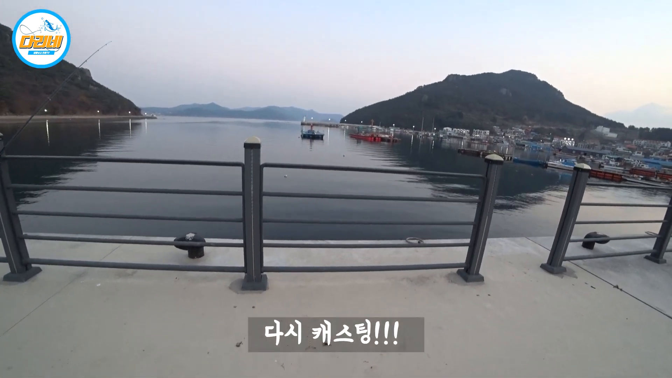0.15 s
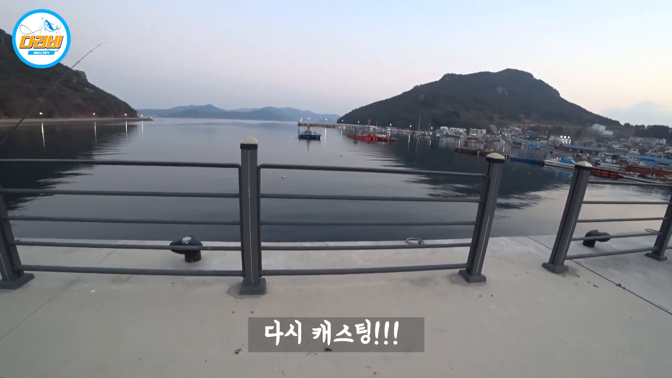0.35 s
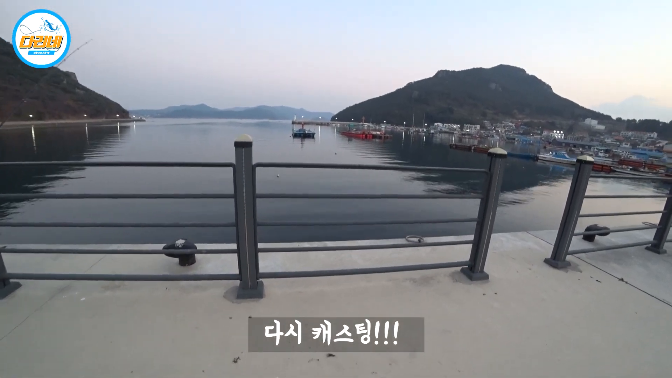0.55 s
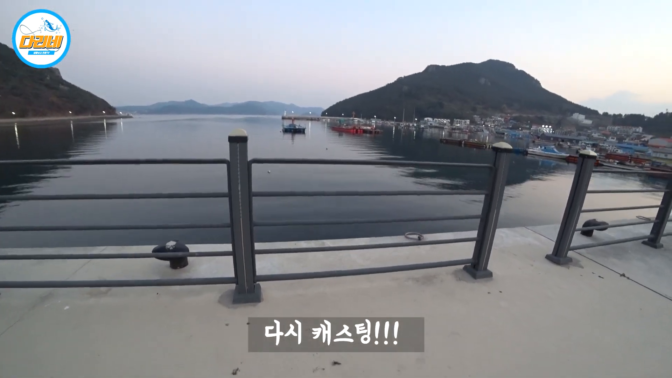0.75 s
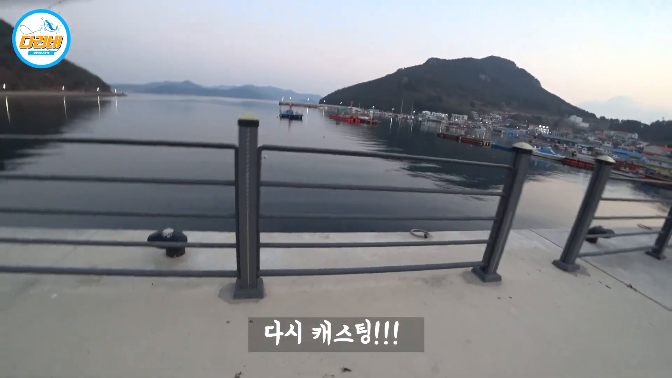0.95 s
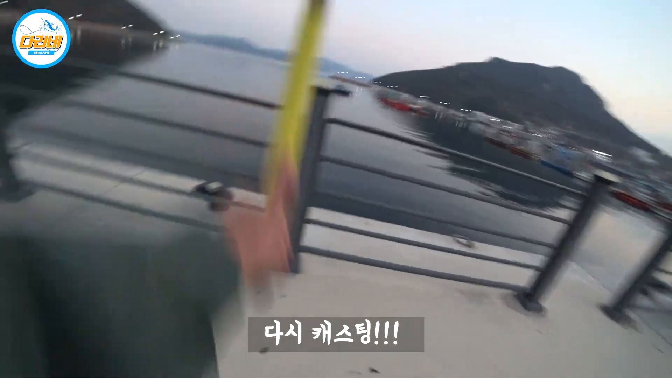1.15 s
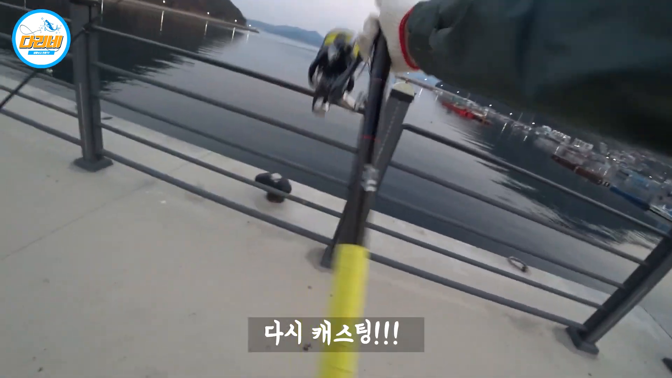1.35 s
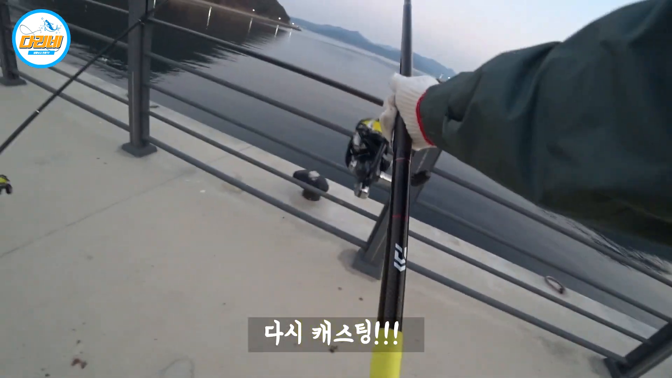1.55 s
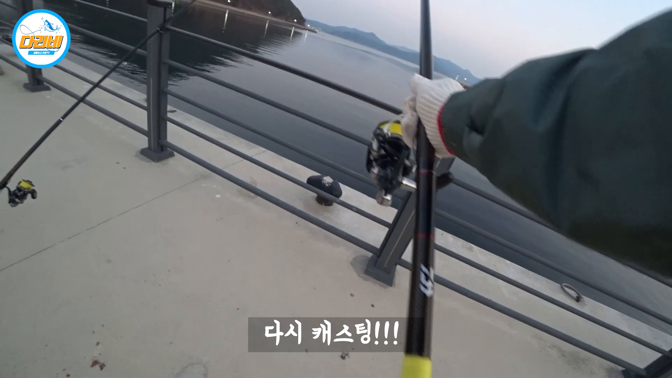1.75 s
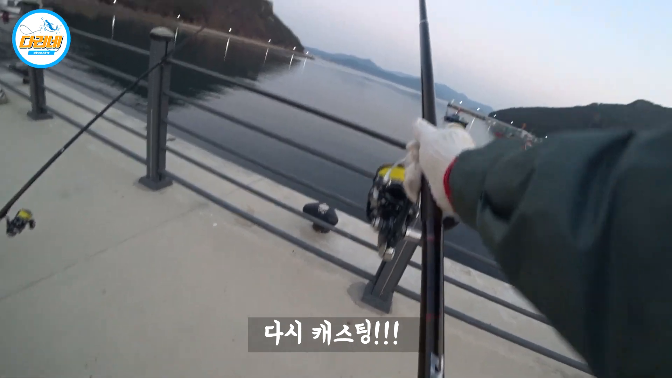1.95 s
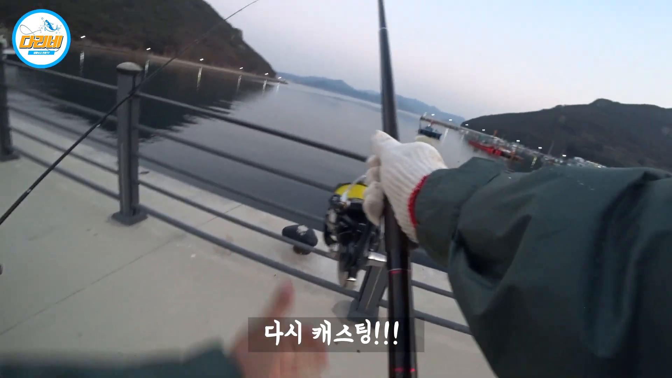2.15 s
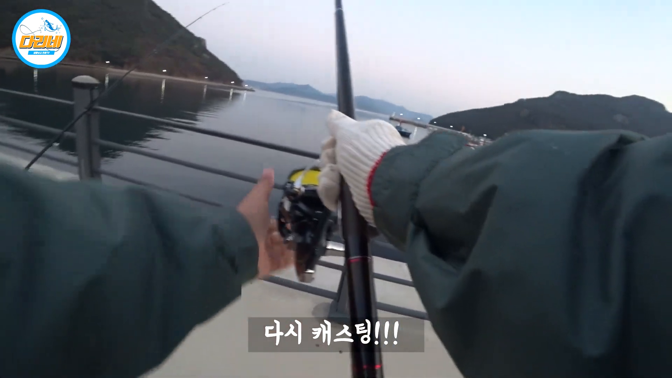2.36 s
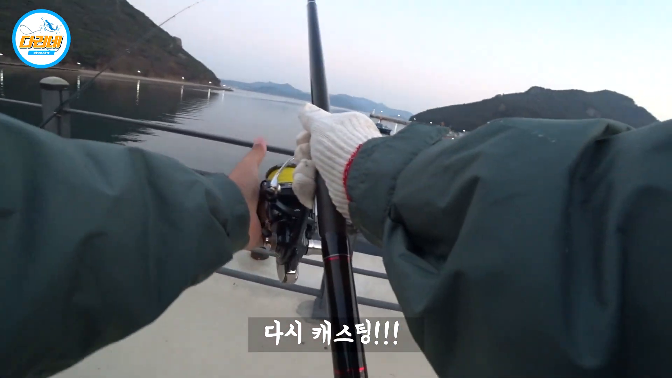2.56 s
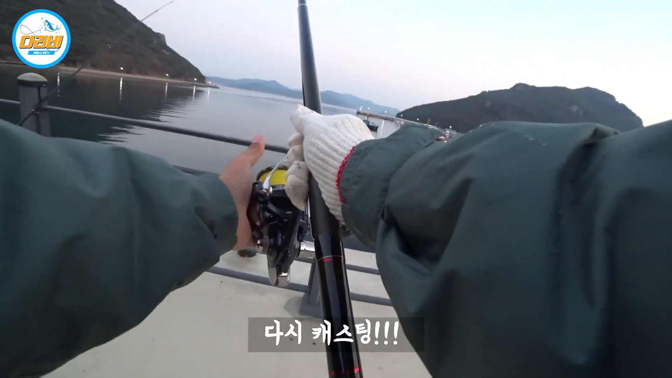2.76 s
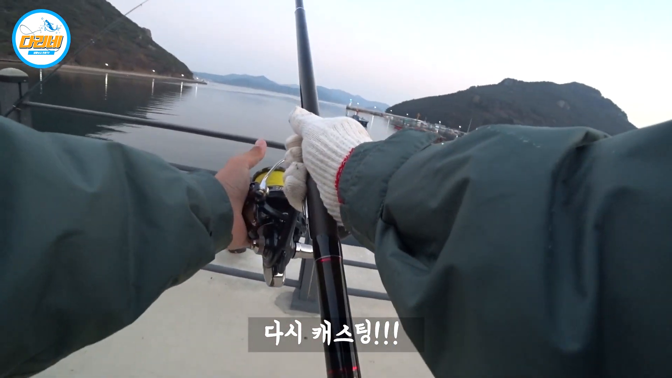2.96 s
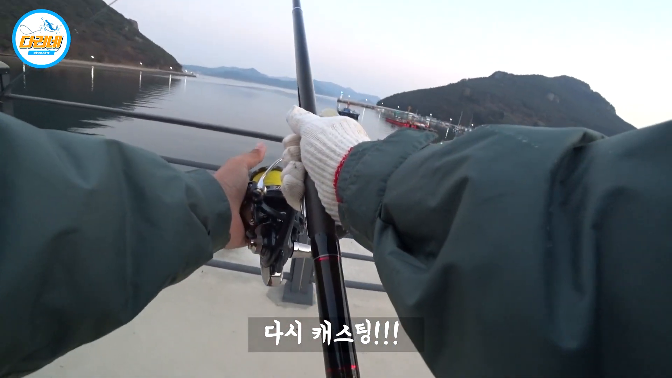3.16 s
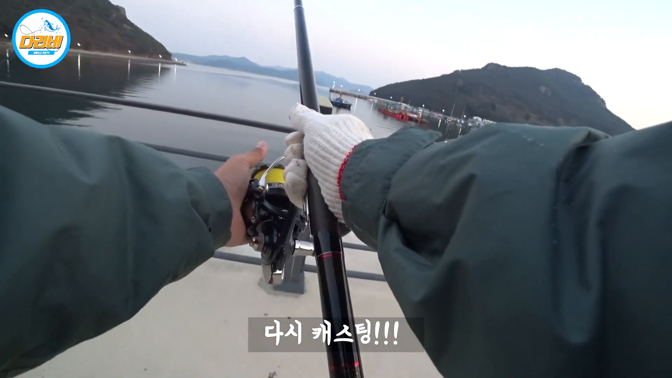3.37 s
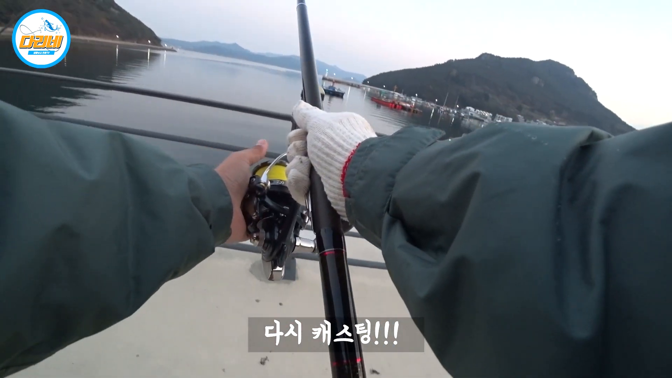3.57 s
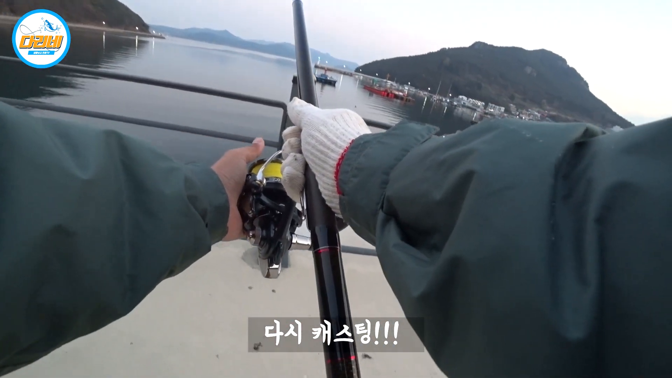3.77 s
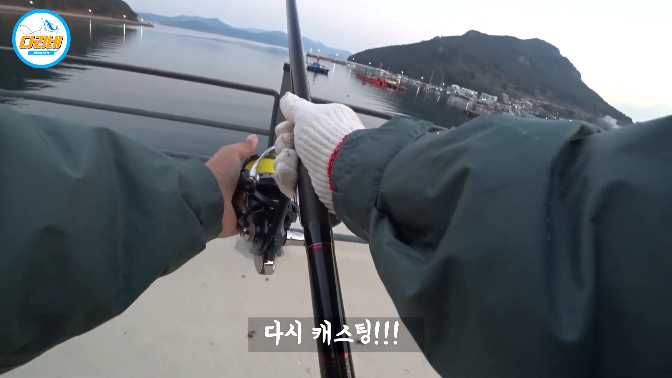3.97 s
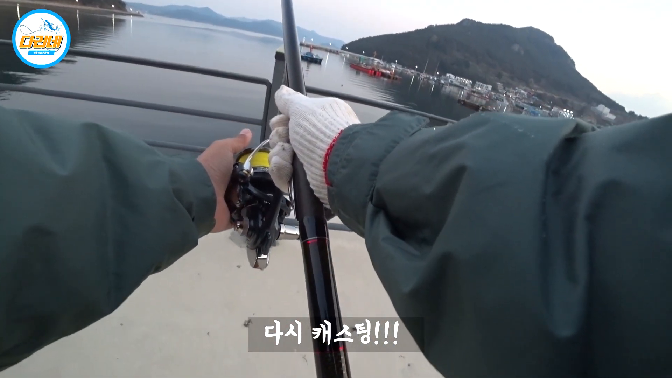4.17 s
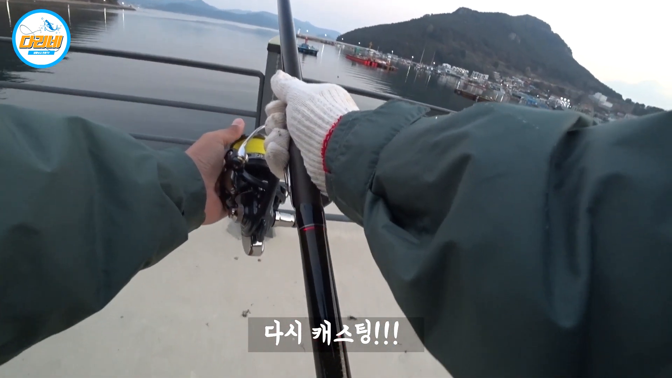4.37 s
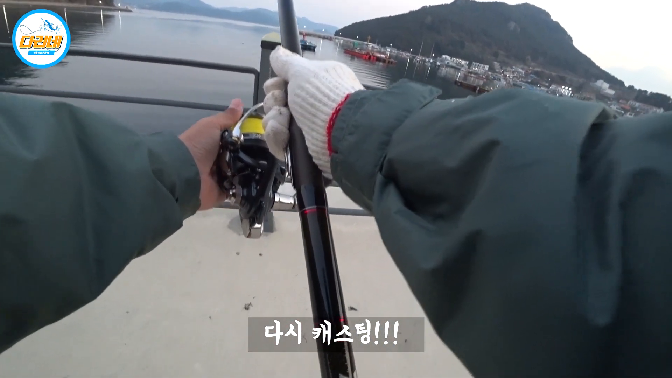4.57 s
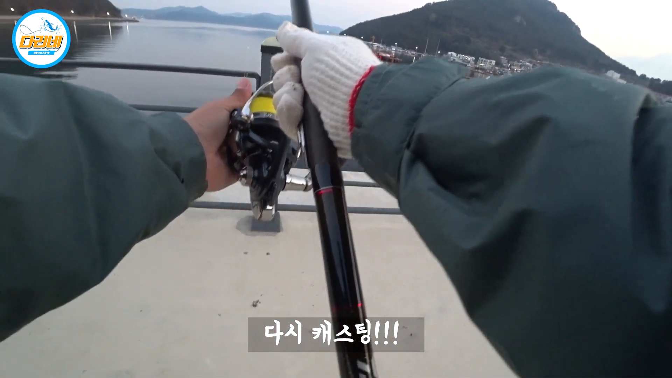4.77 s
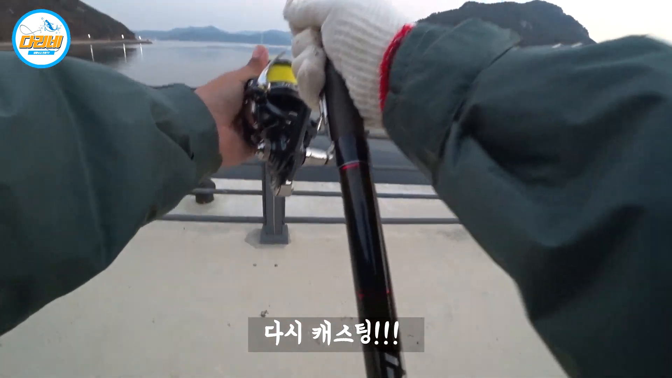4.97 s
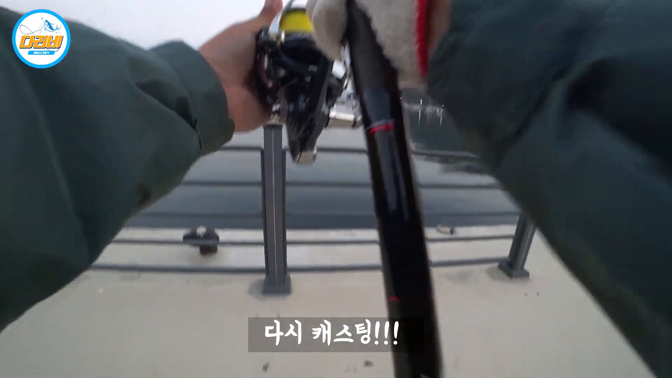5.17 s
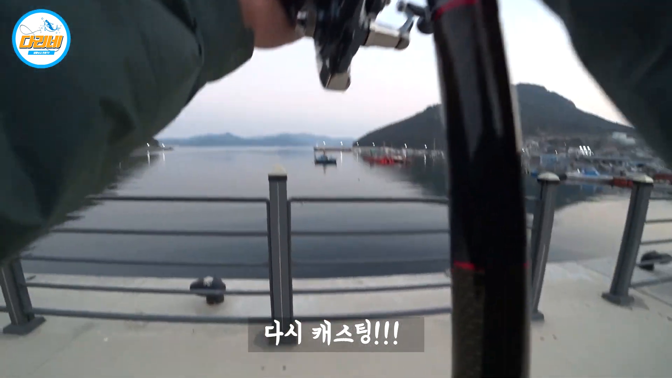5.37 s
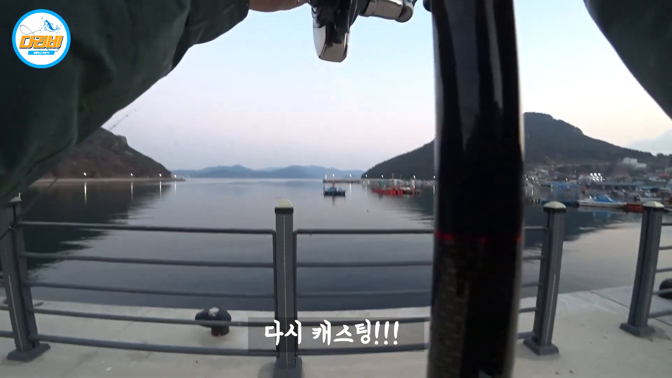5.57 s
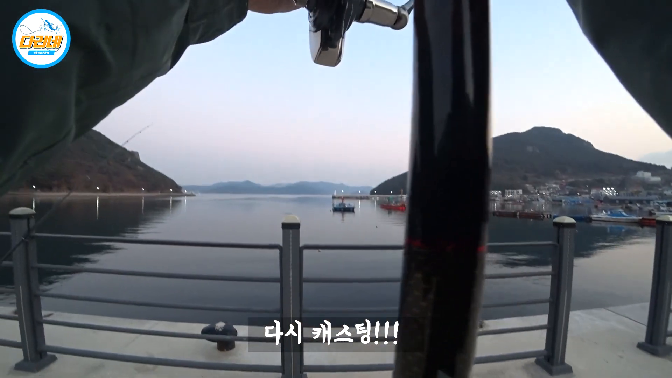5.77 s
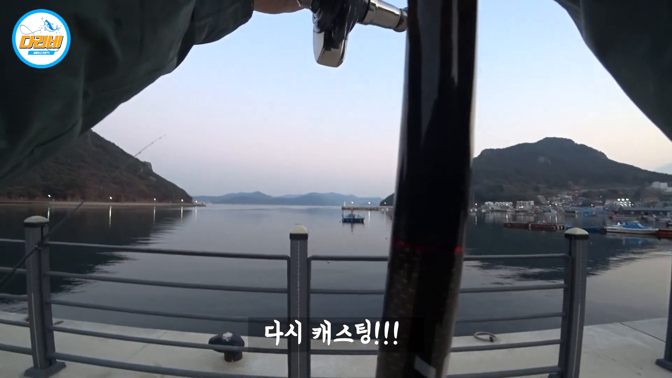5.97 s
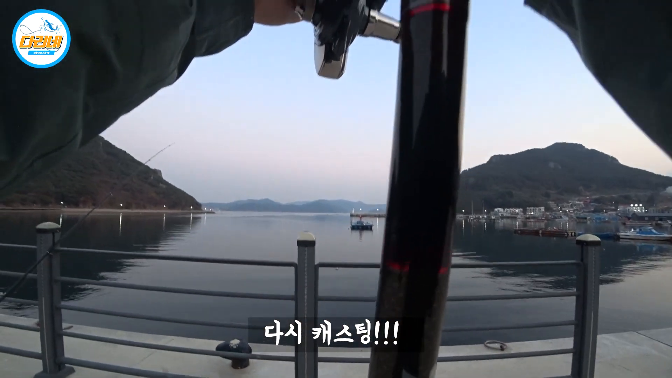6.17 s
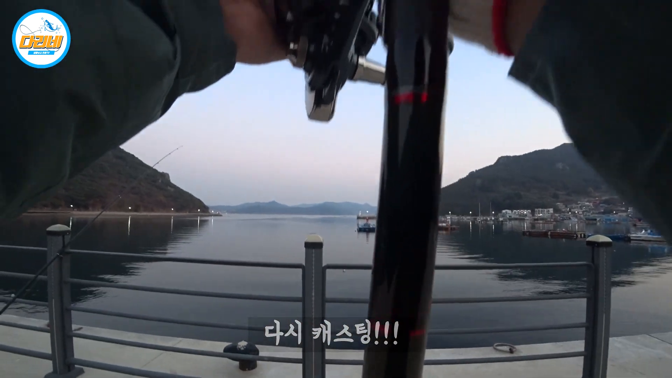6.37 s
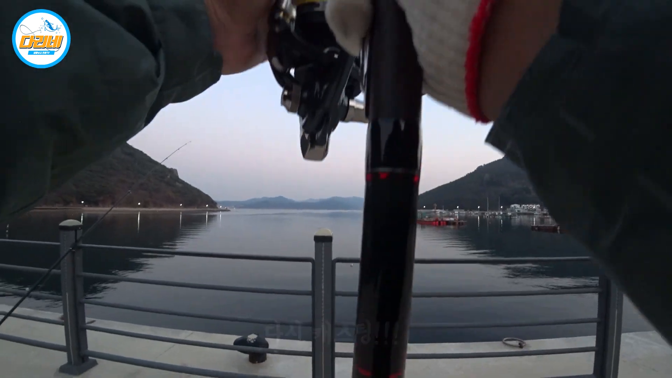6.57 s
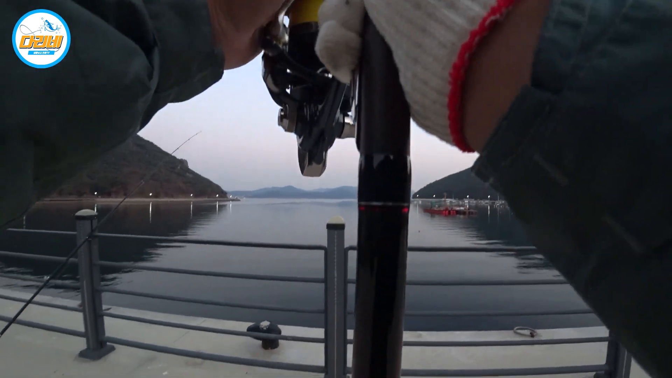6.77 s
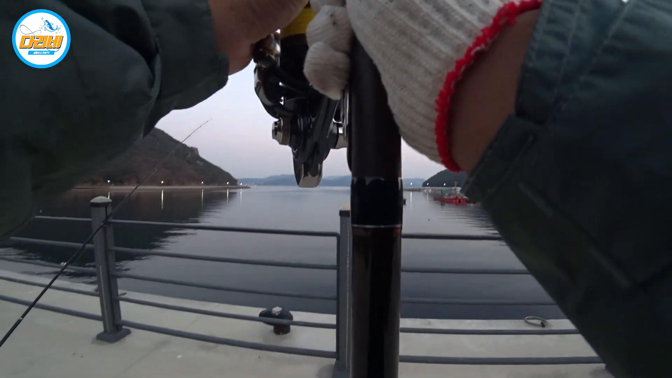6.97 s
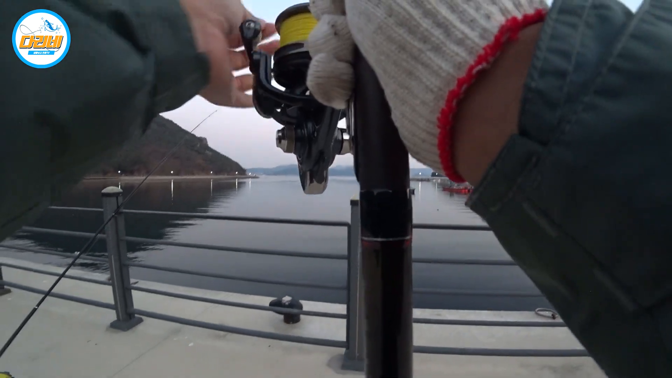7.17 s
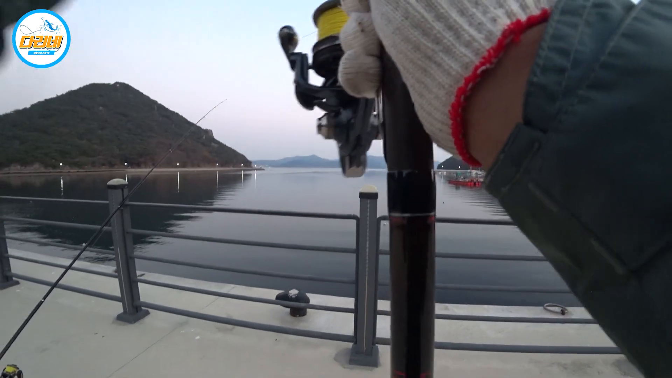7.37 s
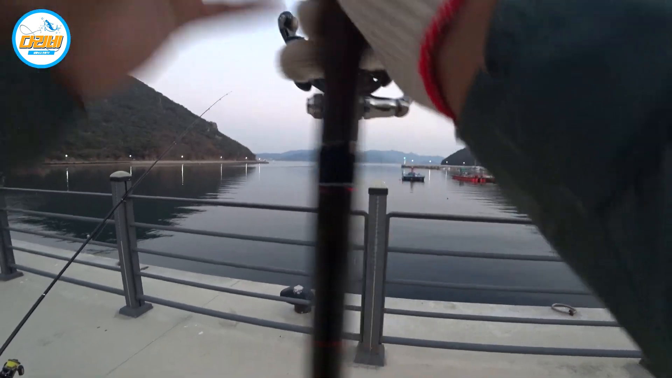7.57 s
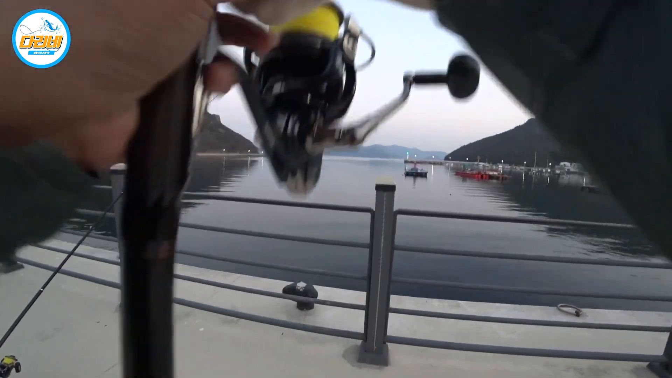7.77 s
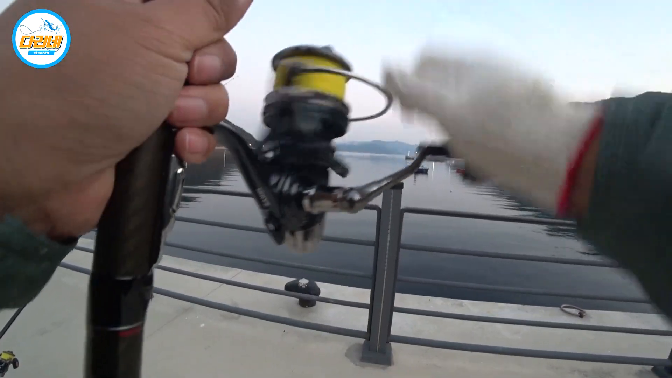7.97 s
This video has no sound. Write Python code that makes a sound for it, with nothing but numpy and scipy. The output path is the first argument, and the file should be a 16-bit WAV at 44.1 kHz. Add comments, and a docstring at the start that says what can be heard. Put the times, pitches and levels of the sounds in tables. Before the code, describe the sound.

On a quiet harbour quay, a cast swishes, line whirrs off a fishing reel for over three seconds, stops, and a wire bail snaps closed.

```python
"""A quiet harbour quay, heard from the chest of an angler who casts.
Line hisses over the spool lip, ringing spool and rod until a hand brakes it; loops slap the lip.
The bail wire later snaps shut and bounces: short clusters of ringing partials and knocks.
Bands of noise whip, swish and scuff, the jacket rustles, cloth and tackle snap, a loose fitting ticks.
Behind lie murmuring noise bands, a far engine's narrow hum and an evenly chirping cricket tone."""
import sys
import numpy as np
from scipy.fft import rfft, irfft, next_fast_len
from scipy.io import wavfile
from scipy.ndimage import map_coordinates

SR = 44100
rng = np.random.default_rng(int(sys.argv[2]) if len(sys.argv) > 2 else 0)


def bounce(signal):
    """Save signal as a 16-bit WAV file at the path given by the first command-line argument."""
    frames = np.transpose(np.atleast_2d(signal))
    limited = np.clip(frames, -1, 1)
    pcm = np.round(limited * 32767).astype(np.int16)
    wavfile.write(sys.argv[1], SR, pcm)


N = 353682  # samples

# Line paying out until the hand brakes it, before swell and flutter:
# [t/s, hiss level/dB, spool ring over hiss level/dB, rod ring level/dB]
LINE = [(1.24, -35, 14, -46), (1.45, -46.5, 11, -46), (1.62, -43.5, 6, -38), (1.82, -43, 8.5, -38),
        (2.13, -42, 13, -29), (2.17, -41.5, 16.5, -36), (2.24, -41, 13, -33), (2.4, -42.5, 11, -35),
        (2.6, -44, 18.5, -35.5), (2.83, -42.5, 20.5, -29), (3.1, -43.5, 10, -33), (3.4, -45.5, 10.5, -35),
        (3.6, -43.5, 7, -33), (3.9, -44, 9.5, -36.5), (4.3, -43.5, 13, -31.5), (4.55, -38, 14.5, -26.5),
        (4.6, -39.5, 20, -21), (4.64, -42, 13, -28), (4.72, -47.5, 16, -23), (4.77, -72, 19, -22),
        (4.82, -104, -4, -39)]
# Tone of line scraping the lip: [f/Hz, relative level/dB]
HISS_TONE = [(800, -31.5), (2500, -12.5), (3400, -5.5), (5000, -8.5), (6500, -4), (8700, -8.5), (10500, -3),
             (12000, -12.5)]
# Resonances of the rod and its guides: [f/Hz, width/Hz, relative level/dB]
ROD_MODES = [(464, 160, -10.5), (1297, 46, -2), (1547, 84, -0.5), (1920, 136, -5), (2175, 76, -4)]
# Sharp deep and high rings of the spool, and its broad ring: [f/Hz, width/Hz, relative level/dB]
SPOOL_DEEP = [(3885, 40, -1), (3190, 90, -14), (4030, 50, -7)]
SPOOL_HIGH = [(6630, 46, -1), (6500, 92, -10)]
SPOOL_BROAD = [(4020, 180, 4.5)]
# Resonances of the spool lip: [f/Hz, width/Hz, relative level/dB]
LIP_MODES = [(10870, 88, 7.5), (10470, 310, -2)]
# Loops slapping the lip: [t/s, relative level/dB]
SLAPS = [(1.6342, -23), (2.765, -25), (2.893, -24), (2.913, -22), (3.0, -25), (3.028, -15.5), (3.0405, -21),
         (3.3693, -27), (3.443, -26), (3.5054, -23), (3.5377, -25), (3.63, -27), (3.9088, -25),
         (4.0615, -26), (4.4555, -25), (4.5117, -24), (4.555, -26), (4.6284, -25), (4.646, -28),
         (4.6944, -25)]
# The coils climb up and down the spool and the hiss swells with them, slower as the sinker slows
SWELL_SLOW_HZ, SWELL_EXTRA_HZ, SLOWING_S = 7.21, 5.28, 1.38
# Another pace once the palm touches; A_CREST_S is the time of one crest
PALM_S, SWELL_PALM_HZ, A_CREST_S = 4.22, 8.39, 2.073
SWELL_DB, SWELL_VARIES_DB = 0.67, 0.85
RINGS_SWELL = 0.97  # extra share of the swell in the spool rings
# High spool ring over the deep one, fading as the spool empties; it follows the deep one only so far
HIGH_RING_DB, HIGH_FADES_DB_PER_S, HIGH_FOLLOWS_TO_DB = 10, 2.5, 11.5
WHISTLE_DB, WHISTLE_WAVERS_RAD = -22, 1.3  # steady part of the deep ring: relative level, phase drift
JOLT_DB, JOLT_T60_S = -1, 0.028  # each slap shakes the guides: drive over the slap, time to fall 60 dB

# Bail wire contacts, a blow and its bounces: [t/s, relative level/dB]
BAIL = [(7.1598, -24), (7.1607, -2), (7.1618, -2), (7.1664, -13), (7.169, -19), (7.1735, -19),
        (7.1765, -19), (7.1789, -5), (7.181, -16), (7.1855, -9), (7.1915, -18), (7.1945, -6), (7.1988, -14),
        (7.206, -27)]
# Partials of the bail wire, before random spread: [f/Hz, relative level/dB, time to fall 60 dB/s]
WIRE = [(1800, -4, .014), (2500, -10, .012), (3200, -4, .014), (3900, -4, .01), (4450, -2, .016),
        (5200, -8, .012), (5900, -5, .012), (6200, 2, .021), (7500, -8, .008)]
# Partials of reel body and spool, before random spread: [f/Hz, relative level/dB, time to fall 60 dB/s]
BODY = [(436, -10, .17), (465, -14, 0.14), (870, -19, 0.1), (942, -18, 0.11), (1010, -20, 0.08),
        (3890, -30, .13)]
KNOCK_DB, KNOCK_GROWS_DB_PER_S = -8.5, 200  # the wire settles ever more fully on the body
RING_FADES_DB_PER_S = 220  # the fingers damp the wire as it settles

# Snaps of cloth and tackle: [t/s, relative level/dB, f/Hz, left over right level/dB]
SNAPS = [(0.721, -42, 1440, 15), (.799, -37.5, 4500, -2), (0.854, -38, 4500, 0), (0.8766, -39, 940, -2),
         (.9423, -36, 1500, -1), (0.972, -35, 3500, 3), (.984, -34, 2500, 6), (1.0304, -30, 2920, 18),
         (1.0315, -32.5, 1200, 6), (1.054, -24.5, 5000, 12), (1.056, -33, 2000, 8),
         (1.0755, -16.5, 3570, 12), (1.0855, -37, 2500, 8), (1.139, -31, 2000, 6), (1.143, -28, 2200, 13),
         (1.149, -26.5, 1620, 17), (1.29, -16, 1570, -3), (1.3656, -26, 5500, -3),
         (1.5629, -13, 3660, -0.5), (1.989, -33.5, 990, -4), (2.011, -37, 804, 3), (2.038, -23, 4680, -2),
         (2.0932, -35, 1300, 2), (2.124, -32, 1060, 6), (2.2051, -22, 2100, 12), (2.213, -17, 3600, 7.5),
         (2.238, -37, 1450, 19), (2.266, -37, 1200, 3), (2.298, -39.5, 1100, 3), (2.3165, -28, 2160, 17),
         (2.421, -32.5, 2760, 13), (2.6329, -29.5, 3000, 11), (2.8889, -23.5, 4900, -3),
         (3.693, -34, 1710, 0), (5.182, -40, 990, -3), (5.2185, -38, 2100, -5), (5.352, -35.5, 1130, -5),
         (5.3677, -29.5, 1660, -1), (6.205, -43, 1500, -4), (6.9287, -39, 2100, -18), (7.324, -46, 990, 8),
         (7.454, -41, 1000, 2)]
SNAP_CYCLES, CRACK_REACH = 6.9, 1.06  # cycles to fall 60 dB; crack cutoff as a multiple of the pitch

# Arm movements; rise and fall span 10 dB: [peak t/s, rise t/s, fall t/s, dull half level/dB,
# bright half over dull half level/dB, left over right level/dB]
MOVES = [(.6, 0.44, 0.69, -54, -2, 3.5), (.98, 0.18, 0.44, -43, 3.5, 2), (1.14, 0.14, 0.26, -41, 1, 4),
         (1.22, 0.14, 0.1, -38, 2, 6.5), (1.3, 0.13, 0.11, -38.5, 11.5, 2), (1.39, 0.21, 0.18, -38, 6.5, 1),
         (2.05, 0.99, 0.15, -47, 2, -3), (2.24, 0.12, 0.25, -41.5, -12, 3.5), (4.55, 0.76, 1, -52, 1, -1.5),
         (5.32, 0.3, 0.1, -45, -5.5, -8), (5.45, 0.65, 0.16, -52.5, 9, -0.5),
         (6.35, 0.44, 0.93, -59.5, 5, -0.5), (7.53, 0.69, 0.2, -54, 5, 6),
         (7.68, 0.45, 0.098, -59, 13.5, 0), (8.0, 0.55, 0.11, -53.5, 9, -1.5)]
# Tone of the jacket cloth: [f/Hz, relative level/dB]
CLOTH_TONE = [(120, -56), (200, -23), (391, -9.5), (615, -2.5), (1290, -2), (1520, -3), (2060, -4.5),
              (5440, -6.5), (11000, -19.5), (14300, -51), (22000, -120)]
# Small pops of the cloth, one row per crease size: [f/Hz, width/Hz, relative level/dB]
CREASES = [(936, 160, 4), (1900, 450, -2), (3620, 1100, 0)]
REST_DB, REST_BRIGHT_DB = -55, -9.5  # the jacket never lies quite still; bright half over dull half
# 1 = pointed peak, 2 = round; brightness lost as a movement slows
ROUNDNESS, DULLS_DB_PER_DB = 1.25, 0.9
POPS_PER_S, POP_DB = 21, 26.5  # for each crease size; relative level

# Brief band-limited noises, the whip and swish of the cast, then rubs and scuffs:
# [start t/s, peak t/s, end t/s, level/dB, low f/Hz, high f/Hz]
SWISHES_AND_SCUFFS = [(1.282, 1.291, 1.308, -26, 1100, 11000), (1.315, 1.34, 1.4, -36, 2600, 3600),
                      (1.222, 1.235, 1.27, -34, 2300, 7000), (1.33, 1.345, 1.355, -34, 4900, 7500),
                      (1.363, 1.366, 1.374, -28, 3000, 11000), (1.47, 1.53, 1.565, -43, 1500, 7500),
                      (3.02, 3.03, 3.055, -42, 1200, 6000), (4.27, 4.31, 4.35, -41, 1900, 4000),
                      (4.3, 4.36, 4.42, -36.5, 420, 5500), (6.05, 6.09, 6.15, -53, 815, 885),
                      (6.06, 6.11, 6.16, -56, 1200, 1900), (6.22, 6.38, 6.56, -59, 255, 500),
                      (7.7, 7.77, 7.81, -56, 5450, 5750), (7.75, 7.8, 7.86, -40, 5200, 11000),
                      (7.965, 7.975, 8.05, -48, 5200, 10500)]

# A small loose fitting touching the rod: [t/s, relative level/dB]
TICKS = [(0.1266, -34), (7.968, -33.5)]
# Partials of that fitting, before random spread: [f/Hz, relative level/dB, time to fall 60 dB/s]
FITTING = [(1060, -3, .018), (1620, -3, .013), (4350, 0, .014), (5240, -8, .01), (7240, -4, .009)]

# Harbour murmur before lapping: [t/s, level/dB]
HARBOUR = [(0, -66), (.9, -65.5), (1.2, -57), (2.2, -59.5), (3.3, -60), (4.2, -63), (4.7, -56.5),
           (5.2, -63), (5.7, -60), (6.4, -54.5), (6.9, -61), (7.5, -57.5), (8.02, -57.5)]
# Tone of the murmur: [f/Hz, relative level/dB]
MURMUR_TONE = [(15, -58), (25, -44.5), (173, -7.5), (206, -9.5), (305, 0.5), (394, -3.5), (430, -1.5),
               (468, -3.5), (595, -6.5), (1500, -25), (1950, -31), (3300, -120)]
# Tone of the open air: [f/Hz, relative level/dB]
AIR_TONE = [(500, -3), (1200, 4), (3000, -29), (6500, 8), (9000, -1.5), (12000, 0)]
# Orders of the far engine: [f/Hz, width/Hz, level/dB]
HUM = [(90.7, 14, -81.5), (178.7, 7.7, -75), (305.3, 10, -71)]
# Cricket, level before flutter: [f/Hz, level/dB, first chirp t/s, period t/s]
CRICKET = (8120, -68.5, .0222, .10244)

TOP_HZ = 12400  # band limit


def amp(db):
    """dB to gain."""
    return 10 ** (np.asarray(db) / 20)


def unit(x):
    """Scales x to an rms of 1."""
    return x / np.sqrt(np.mean(x ** 2) + 1e-20)


def along(points, hz):
    """Reads (Hz, value) points on a log frequency axis."""
    f, v = np.transpose(points)
    return np.interp(np.log(hz + 1), np.log(f + 1), v)


def curves(rows):
    """One value per sample for each column after the time."""
    s, *cols = np.transpose(rows)
    return [np.interp(np.arange(N) / SR, s, c) for c in cols]


def wobble(rate):
    """A smooth random curve with rate knots a second."""
    knots = rng.standard_normal(int(N * rate / SR) + 4)
    return map_coordinates(knots, [np.arange(N) * rate / SR])


def filtered(x, response):
    """Multiplies the spectrum of x by a complex response of frequency."""
    m = next_fast_len(x.shape[-1] + 8192)
    spectrum = rfft(x, m) * response(np.fft.rfftfreq(m, 1 / SR))
    return irfft(spectrum, m)[..., :x.shape[-1]]


def colour(points):
    """Response through (Hz, dB) points."""
    return lambda hz: amp(along(points, hz))


def modes(rows):
    """Causal response of (Hz, width, dB) resonances with alternating signs."""
    def response(f):
        total = 0
        for k, (centre, width, db) in enumerate(rows):
            damping = 1j * f * width
            total = total + (-1) ** k * amp(db) * damping / (centre ** 2 - f ** 2 + damping)
        return total
    return response


def gritty_noise(alike, grit, grit_db, count=N):
    """Stereo noise with about grit sharp catches a second, identical left and right, riding on it."""
    turn = np.arccos(np.clip(alike, 0, 1)) / 2
    mid, side = rng.standard_normal((2, count)) * [[np.cos(turn)], [np.sin(turn)]]
    hits = rng.random(count) < grit / SR
    catches = hits * rng.uniform(-1, 1, count) * amp(grit_db)
    return np.array([mid + side, mid - side]) + catches


def panned(pan_db):
    """Left and right gains whose ratio is pan_db."""
    return amp(np.array([pan_db / 2, -pan_db / 2]))


def add(out, s, x):
    """Mixes x in at time s."""
    piece = out[..., round(s * SR):][..., :x.shape[-1]]
    piece += x[..., :piece.shape[-1]]


def ringing(level, rows, grit):
    """Uneven scraping at the given strength drives a set of resonances."""
    uneven = amp(1.8 * wobble(30))
    return filtered(level * uneven * gritty_noise(0.79, grit, 19), modes(rows))


def swelling():
    """Rise and fall of the hiss in dB as the coils travel along the spool."""
    t = np.arange(N) / SR
    rate = SWELL_SLOW_HZ + SWELL_EXTRA_HZ * np.exp(-((t - LINE[0][0]) / SLOWING_S) ** 2)
    turns = np.cumsum(np.where(t < PALM_S, rate, SWELL_PALM_HZ)) / SR
    depth = SWELL_DB + SWELL_VARIES_DB * wobble(5.88)
    return depth * np.cos(2 * np.pi * (turns - turns[round(A_CREST_S * SR)]))


def loop_slaps():
    """Loops strike the lip as short noise bursts; returns lip and spool sound, and the shaken rod."""
    slaps, jolts, t = np.zeros((2, N)), np.zeros(N), np.arange(SR // 20) / SR
    for s, db in SLAPS:
        burst = rng.standard_normal(len(t)) + 0.14 * rng.standard_normal((2, len(t)))
        add(slaps, s, amp(db - 60 * t / 0.0051) * burst)
        add(jolts, s, amp(db + JOLT_DB - 60 * t / JOLT_T60_S) * rng.standard_normal(len(t)))
    direct = filtered(slaps, colour(HISS_TONE)) * amp(4.5)
    rung = filtered(slaps, modes(SPOOL_DEEP + SPOOL_HIGH + LIP_MODES)) * amp(3.5)
    return direct + rung, filtered(jolts, modes(ROD_MODES))


def line():
    """Line scraping the lip makes a hiss, and such scraping rings the spool, the lip and the rod's guides."""
    hiss_db, deep_db, rod_db = curves(LINE)
    t = np.arange(N) / SR
    start, stop = LINE[0][0], LINE[-1][0]
    swell = swelling()
    deep_db = deep_db + RINGS_SWELL * swell
    high_db = np.minimum(deep_db, HIGH_FOLLOWS_TO_DB + RINGS_SWELL * swell)
    high_db = high_db + HIGH_RING_DB - HIGH_FADES_DB_PER_S * (t - start)

    running = np.clip((t - start) / 0.051, 0, 1) * np.clip((stop - t) / 0.023, 0, 1)
    scrape = running * amp(swell + 0.28 * wobble(38) + 0.76 * wobble(110))
    level = scrape * amp(hiss_db)
    hiss = level * unit(filtered(gritty_noise(0.65, 180, 23.4), colour(HISS_TONE)))

    deep_level = level * amp(deep_db)
    spool = ringing(deep_level, SPOOL_DEEP, 53)
    spool = spool + ringing(level * amp(high_db), SPOOL_HIGH, 92)
    spool = spool + ringing(level, SPOOL_BROAD, 60)
    phase = 2 * np.pi * SPOOL_DEEP[0][0] * t + WHISTLE_WAVERS_RAD * wobble(45)
    whistle = amp(WHISTLE_DB) * deep_level * np.sin(phase)
    lip = ringing(level * amp(8.5), LIP_MODES, 130)

    rod_level = scrape * amp(rod_db - .5 * swell + 2.2 * wobble(28))  # the guides feel the swell less
    slaps, shaken_rod = loop_slaps()
    rod = ringing(rod_level, ROD_MODES, 60) + shaken_rod
    return (hiss + spool + whistle + lip + slaps) * panned(2.1)[:, None] + rod * panned(0.83)[:, None]


def struck(rows, t):
    """Decaying partials of one contact, at new strengths and phases."""
    total = 0
    for hz, db, t60 in rows:
        phase = rng.normal(0, 2.33) + .5 * rng.standard_normal((2, 1))
        total = total + amp(db + rng.normal(0, 1.8) - 60 * t / t60) * np.sin(2 * np.pi * hz * t + phase)
    return total


def bail():
    """Each contact rings the wire, cracks and rattles, and knocks the reel body."""
    out, t = np.zeros((2, N)), np.arange(SR // 4) / SR
    for s, db in BAIL:
        since = s - BAIL[0][0]
        wire = amp(-RING_FADES_DB_PER_S * since) * struck(WIRE, t)
        knock = amp(KNOCK_DB + KNOCK_GROWS_DB_PER_S * since) * struck(BODY, t)
        crack = 5.5 * amp(-60 * t / 0.0008) * rng.choice([-1, 1], len(t))
        grain = rng.standard_normal(len(t)) + .5 * rng.standard_normal((2, len(t)))
        rattle = .95 * amp(-60 * t / .02) * grain
        # the wire is too thin for low noise
        thin = filtered(crack + rattle, lambda hz: (1j * hz / (1j * hz + 900)) ** 3)
        add(out, s, amp(db - 17.0) * (wire + thin + knock))
    # the hand dulls the top
    dulled = filtered(out, lambda hz: 1 / (1 + 1j * hz / 9000 - (hz / 7000) ** 2))
    return dulled * panned(0.98)[:, None]


def snaps():
    """Cloth and tackle snap: a few fast-fading cycles of ring under a short crack, phased per ear."""
    out, t = np.zeros((2, N)), np.arange(SR // 20) / SR
    for s, db, hz, pan_db in SNAPS:
        crack = .55 * amp(-60 * t / .004) * rng.standard_normal((2, len(t)))
        crack = filtered(crack, lambda f: 1 / (1 + 1j * f / (CRACK_REACH * hz)) ** 2)
        phase = 0.88 * rng.random((2, 1))
        ring = amp(-60 * t * hz / SNAP_CYCLES) * np.sin(2 * np.pi * hz * t + phase)
        add(out, s + .001, amp(db + 6) * panned(pan_db)[:, None] * (ring + crack))
    return out


def sleeves():
    """Nylon rubs on nylon; stronger moments of a stroke tip the balance to the bright half."""
    cloth = unit(filtered(gritty_noise(0.21, 300, 18.0), colour(CLOTH_TONE)))
    dull = filtered(cloth, lambda hz: 1 / (1 + (hz / 1800) ** 2))
    bright = cloth - dull
    t = np.arange(N) / SR
    # strokes add up as powers, hence the doubled dB
    dull_power, bright_power = amp(2 * REST_DB), amp(2 * (REST_DB + REST_BRIGHT_DB))
    for peak, rise, fall, db, bright_db, pan_db in MOVES:
        away = np.where(t < peak, (peak - t) / rise, (t - peak) / fall).clip(0)
        drop_db = 10 * away ** ROUNDNESS
        power = amp(2 * (db - drop_db)) * panned(2 * pan_db)[:, None]
        dull_power = dull_power + power
        bright_power = bright_power + power * amp(2 * (bright_db - DULLS_DB_PER_DB * drop_db))

    shape = (len(CREASES), N)
    folds = (rng.random(shape) < POPS_PER_S / SR) * rng.uniform(-1.1, 1, shape)
    pops = amp(POP_DB) * sum(filtered(fold, modes([crease])) for fold, crease in zip(folds, CREASES))
    flutter = amp(0.58 * wobble(40) + 0.99 * wobble(90))
    dull_part = np.sqrt(dull_power) * amp(0.73 * wobble(25)) * (dull + pops)
    bright_part = np.sqrt(bright_power) * amp(1.04 * wobble(25)) * bright
    return flutter * (dull_part + bright_part)


def swishes_and_scuffs():
    """Brief band-limited noises: the whip and swish of the cast, then rubs and scuffs."""
    out, t = np.zeros((2, N)), np.arange(SR // 2) / SR
    for start, peak, end, db, low_hz, high_hz in SWISHES_AND_SCUFFS:
        edge = 5 + 2 * low_hz / (high_hz - low_hz)  # narrow bands have steep edges
        band = lambda hz: 1 / (1 + (low_hz / (hz + 1)) ** edge) / (1 + (hz / high_hz) ** edge)
        swell = np.sin(np.pi / 2 * np.interp(t + start, [start, peak, end], [0, 1, 0]))
        noise = unit(filtered(gritty_noise(0.94, 180, 23, count=len(t)), band))
        add(out, start, amp(db) * swell * noise)
    return out * panned(2.5)[:, None]


def ticks():
    """The loose fitting rings briefly in decaying partials at each touch of the rod."""
    out, t = np.zeros((2, N)), np.arange(SR // 20) / SR
    for s, tick_db in TICKS:
        for hz, db, t60 in FITTING:
            fade = amp(tick_db + db + rng.normal(0, 1.5) - 60 * t / t60)
            add(out, s, fade * np.sin(2 * np.pi * hz * t + rng.normal(0, .4, (2, 1))))
    return out


def cricket():
    """A high tone with a wavering phase, gated into even chirps."""
    hz, db, first, period = CRICKET
    t = np.arange(N) / SR
    # about half of each period sounds
    chirp = np.clip(.5 + 4.2 * np.cos(2 * np.pi * (t - first) / period), 0, 1)
    song = np.sin(2 * np.pi * hz * t + 0.9 * wobble(90))
    return amp(db + 1.5 * wobble(10)) * chirp * song


def engine():
    """A far engine's wavering orders: noise through narrow resonances."""
    hum = np.zeros(N)
    for hz, width, db in HUM:
        hum += amp(db) * unit(filtered(rng.standard_normal(N), modes([(hz, width, 0)])))
    return hum


def harbour():
    """Far town and water murmur as low noise with lapping levels, under a thin airy hiss."""
    low_db, = curves(HARBOUR)
    lapping_db = 1.8 * wobble(9)
    low = amp(low_db + lapping_db) * unit(filtered(gritty_noise(0.93, 0, 0), colour(MURMUR_TONE)))
    high = amp(-64 + 1.5 * wobble(14)) * unit(filtered(gritty_noise(0.2, 30, 11), colour(AIR_TONE)))
    return low + high


def scene():
    """All sources in the open air; the bail, snaps and ticks carry little bass."""
    small = bail() + snaps() + ticks()
    small = filtered(small, lambda hz: (1j * hz / (1j * hz + 250)) ** 3 / (1 + 1j * hz / 9000))
    return line() + small + sleeves() + swishes_and_scuffs() + cricket() + engine() + harbour()


def record(dry):
    """Band limit: the sound falls steeply above 11010 Hz and stops at TOP_HZ."""
    return filtered(dry, lambda hz: amp(-.1 * np.clip(hz - 11010, 0, None)) * (hz < TOP_HZ))


dry = scene()
out = record(dry)
bounce(out)
```